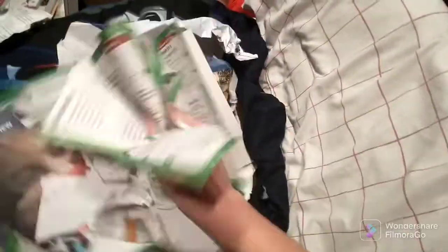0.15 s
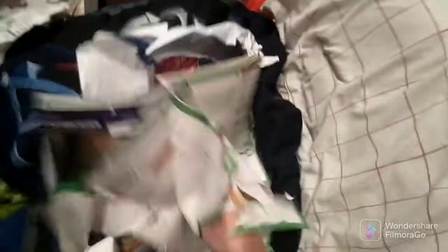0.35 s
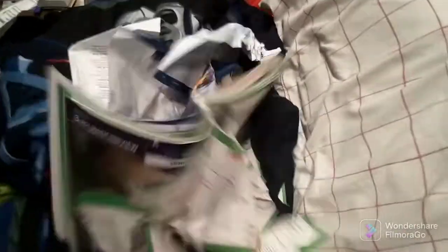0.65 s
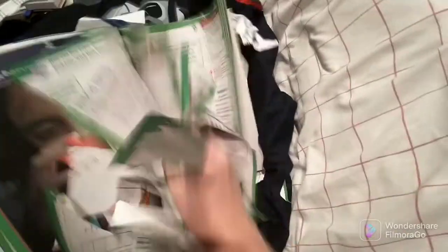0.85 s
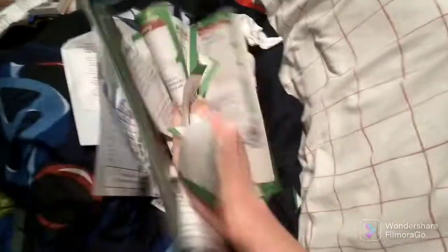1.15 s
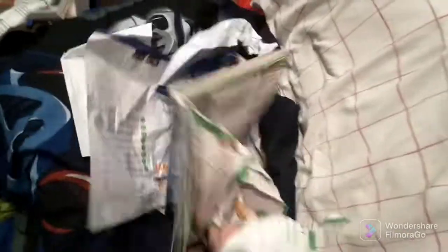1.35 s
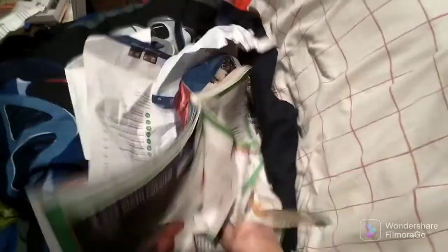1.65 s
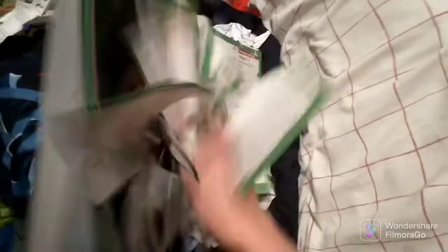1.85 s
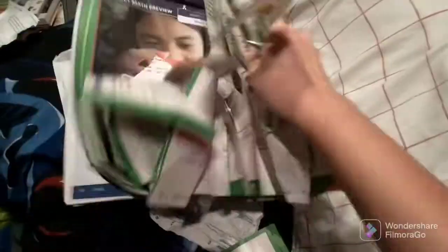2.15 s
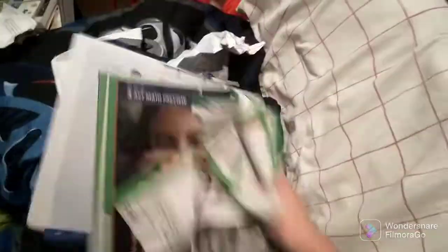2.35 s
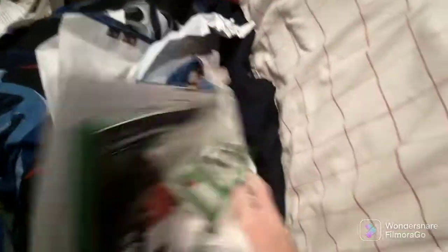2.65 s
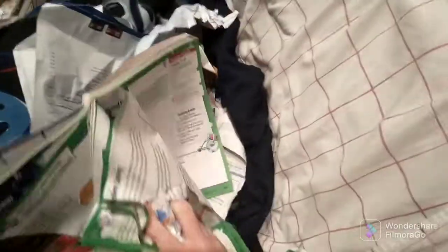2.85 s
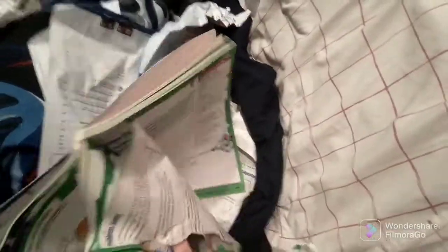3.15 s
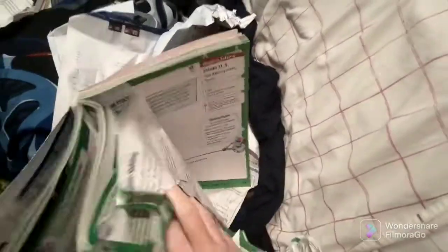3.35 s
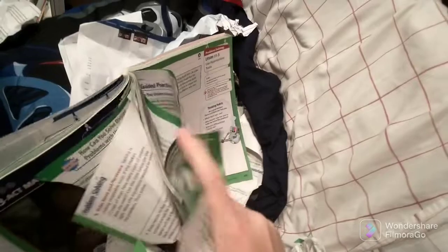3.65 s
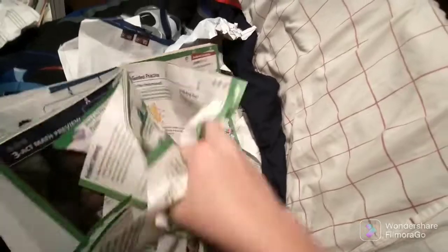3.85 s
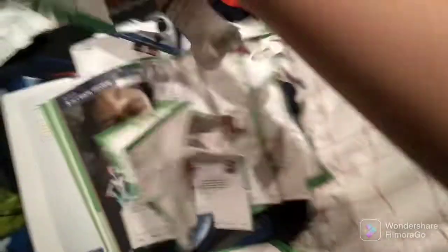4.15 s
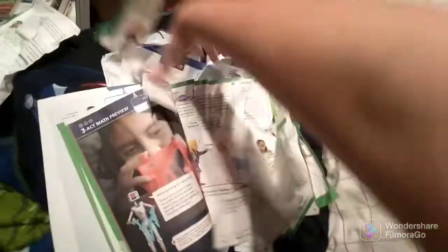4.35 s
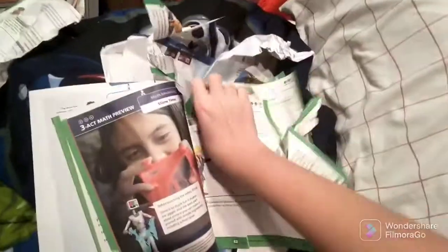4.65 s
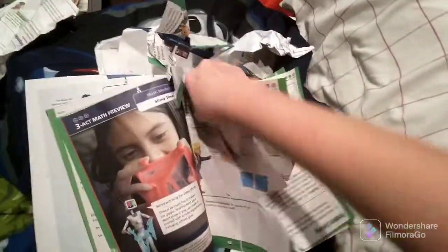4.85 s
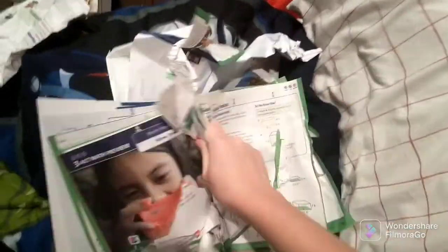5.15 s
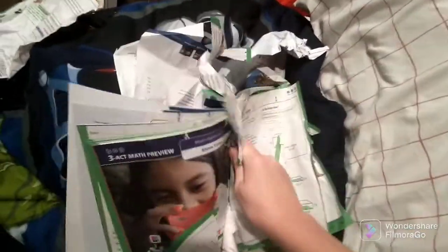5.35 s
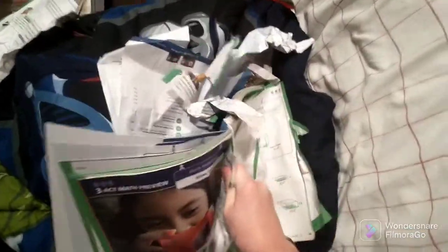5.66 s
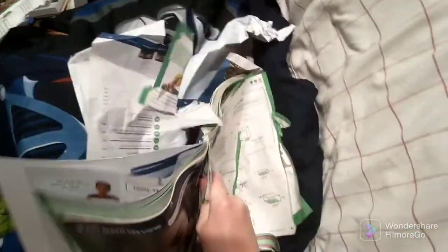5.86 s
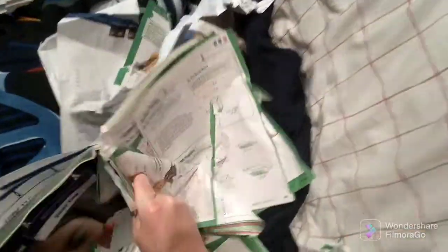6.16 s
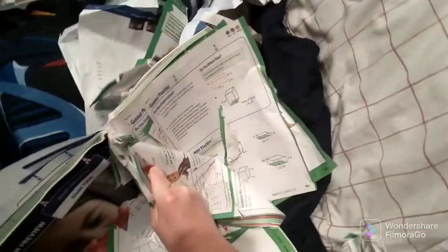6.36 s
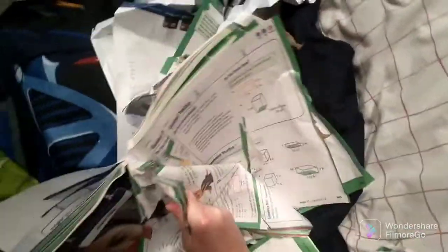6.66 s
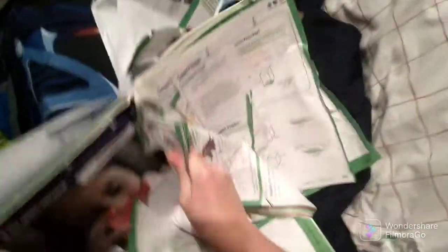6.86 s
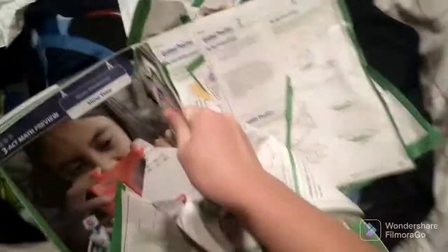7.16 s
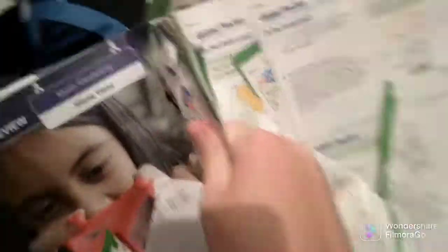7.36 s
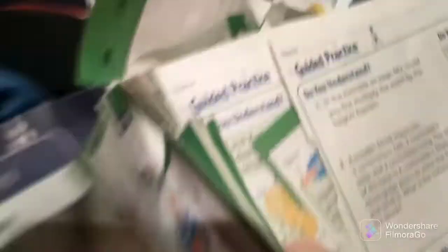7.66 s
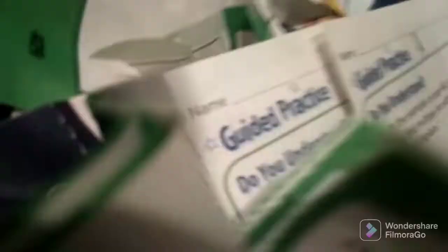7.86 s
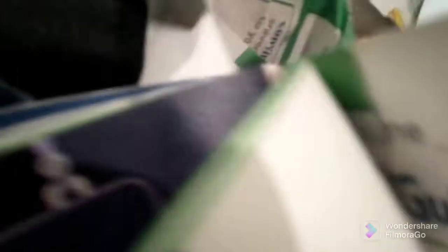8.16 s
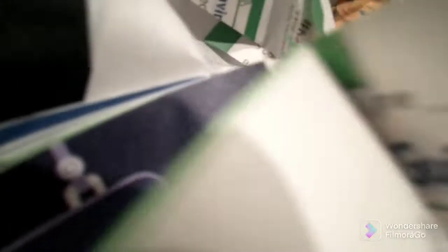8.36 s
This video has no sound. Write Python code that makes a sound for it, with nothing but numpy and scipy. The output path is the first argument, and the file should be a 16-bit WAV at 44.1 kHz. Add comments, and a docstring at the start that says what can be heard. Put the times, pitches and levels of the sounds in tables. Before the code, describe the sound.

In a small soft bedroom, a hand yanks a workbook's pages in hard, regular tugs, with flapping, crackling and sharp rips. A much quieter slow tear follows, then gentle gripping, sliding and leafing with scattered crease snaps and faint spine ticks. After a near-silent moment, a page is crushed right against the stereo microphone with loud pops, low thumps and a short buzzing rub.

```python
"""In a small soft bedroom a workbook on a bed is first jerked by hard tugs, its pages flapping and ripping.
A slow pull follows, then gripping and leafing with a ticking spine; last, a page is crushed beside the microphone.
Hand work is shaped noise: air pushes below, sheet buckling in the middle, tiny fibre cracks on top.
Creases are chirped clicks, rips are fading bursts of cracks, and bumps are short decaying sines.
Sparse reflections and a faint hush surround them; two microphone ports hear it all in stereo."""
import sys
import numpy as np
from scipy import signal
from scipy.fft import rfft, irfft
from scipy.io import wavfile
from scipy.ndimage import uniform_filter1d

SR = 44100
rng = np.random.default_rng(int(sys.argv[2]) if len(sys.argv) > 2 else 0)


def wrap_up_sound(samples):
    """Save the sound to the file named by the first command line argument, as 16-bit audio."""
    columns = np.atleast_2d(samples).T
    # keep every value between -1 and 1, then stretch to whole-number steps
    tamed = np.clip(columns, -1, 1)
    steps = np.round(tamed * 32767).astype(np.int16)
    wavfile.write(sys.argv[1], SR, steps)


N = 375286  # length in samples

# spectrum of the background hush: [f/Hz, gain/dB]
HUSH_COLOUR = [(50, -7), (15000, -20)]
# decay time of the bedroom's reflections: [f/Hz, T60/s]
ROOM_T60 = [(8000, 0.1), (15000, 0.022)]
# the microphone dulls its top: [f/Hz, gain/dB]
TOP_SHELF = [(10200, 0.5), (11600, -7.5)]
# left port against right port: [f/Hz, level difference/dB]
PORT_BALANCE = [(380, -3), (1290, 0), (4400, 1), (8120, -3.5), (15000, -7)]
# when ripping, pulling, gripping, leafing and crushing begin, and the end: [t/s]
STAGE_TIMES = [0, 2.6, 4.05, 6.0, 7.7, 8.515]
# colour of the paper in each stage: [f/Hz, gain/dB]
RIPPING_COLOUR = [(40, -4.5), (110, 2.5), (290, -5.5), (470, 4), (600, -2.5), (760, 2), (1080, -6),
                  (1400, 4), (1680, -4), (2050, -1), (3000, -13), (15500, -15)]
PULLING_COLOUR = [(50, -10), (123, -1.5), (247, -4.5), (472, 3), (1000, -2.5), (2450, -3.5), (3140, -14),
                  (9000, -13), (15500, -13)]
GRIPPING_COLOUR = [(130, 0), (560, 1), (2000, -1), (3100, -7.5), (8000, -12), (15500, -17.5)]
LEAFING_COLOUR = [(100, -3.5), (900, -5), (1600, -10), (4600, -7), (7500, -6.5), (15500, -14)]
CRUSHING_COLOUR = [(40, -2), (120, 1.5), (1200, 0.5), (1650, -3.5), (7000, -18), (15500, -20)]
# colours of a crease's hollow pop and of its bright crack: [f/Hz, gain/dB]
POP_COLOUR = [(150, -12), (450, -2.5), (2400, -3.5), (4000, -38.5)]
CRACK_COLOUR = [(1500, -21.5), (3300, -2.5), (6500, 1.5), (16000, -13.5)]
# the book knocks against the bedding and the fingers: [t/s, envelope peak level/dB, f/Hz]
BUMPS = [(4.888, -34, 380), (5.014, -42, 170), (7.644, -42, 440), (7.671, -42, 900), (7.741, -38, 630),
         (7.788, -33, 950), (7.799, -28.5, 105), (7.859, -31, 164), (7.954, -22, 146), (7.987, -19, 215),
         (8.303, -18.5, 200)]
# the spine ticks as it is bent back: [t/s]
CREAK_TIMES = [6.644, 6.678, 6.746, 6.79, 7.4]
# the held paper stirs between strokes and swells as it nears the microphone at the end:
# [t/s, buckling level/dB, fibre rubbing level/dB]
RUSTLE = [(0, -36.5, -38.5), (2.17, -37.5, -36.5), (2.27, -36.5, -47.5), (2.36, -34.5, -25),
          (2.6, -41.5, -45), (2.67, -47.5, -50), (3.02, -55, -65), (3.4, -65, -50.5), (4.05, -58.5, -59.5),
          (4.5, -68, -67.5), (4.75, -56, -59), (5.85, -65.5, -63.5), (6.45, -56, -61), (6.78, -70, -68.5),
          (7.049, -60, -57.5), (7.569, -70.5, -71), (8.13, -31, -34), (8.51, -38.5, -34)]
# the hand pauses and the rustle sinks: [t/s, half-width/s, level change/dB]
LULLS = [(0.79, 0.035, -4), (1.774, 0.023, -7), (7.55, 0.033, -4.5), (7.712, 0.012, -9)]
# the book is jerked by its pages: [t/s, length/s, buckling level/dB, tearing level/dB]
TUGS = [(0.008, 0.03, -27.5, -28), (0.346, 0.016, -25.5, -27), (0.672, 0.029, -27, -30),
        (0.987, 0.085, -28.5, -32), (1.342, 0.046, -28, -33), (1.689, 0.039, -29.5, -35),
        (1.991, 0.053, -30.5, -30.5), (2.455, 0.016, -30, -32)]
# between tugs the book swings back and its pages flap: [t/s, length/s, buckling level/dB, rubbing level/dB]
FLAPS = [(0.219, 0.051, -34, -37), (0.56, 0.0059, -31, -32.5), (0.873, 0.068, -35, -36),
         (1.204, 0.051, -34.5, -35), (1.548, 0.021, -36, -40.5), (1.657, 0.022, -31.5, -36.5),
         (1.864, 0.048, -31.5, -35), (2.52, 0.011, -31.5, -34)]
# the slow tear advances in separate pulls: [t/s, length/s, buckling level/dB, tearing level/dB]
PULLS = [(2.77, 0.079, -42.5, -43), (2.913, 0.024, -44, -43), (3.082, 0.025, -49.5, -49.5),
         (3.167, 0.063, -52, -51), (3.272, 0.19, -50.5, -48.5), (3.532, 0.02, -53.5, -44),
         (3.608, 0.075, -50.5, -47), (3.807, 0.065, -56, -47), (3.892, 0.057, -55, -50)]
# the hand grips, slides over and turns pages: [t/s, length/s, buckling level/dB, rubbing level/dB]
SWIPES = [(4.107, 0.038, -51.5, -66), (4.169, 0.041, -66, -55.5), (4.338, 0.071, -54, -61.5),
          (4.574, 0.017, -58.5, -56), (4.67, 0.071, -59, -58), (4.774, 0.054, -54, -55),
          (5.077, 0.15, -49, -47), (5.303, 0.038, -55.5, -58.5), (5.388, 0.055, -52.5, -56.5),
          (5.904, 0.014, -47, -49.5), (6.063, 0.26, -50.5, -52), (6.225, 0.15, -49.5, -52),
          (6.418, 0.16, -57.5, -51.5), (7.031, 0.073, -49, -51.5)]
# the fist closes on the page by the microphone: [t/s, length/s, buckling level/dB, cracking level/dB]
SQUEEZES = [(7.897, 0.011, -40.5, -53), (8.227, 0.028, -25.5, -24), (8.297, 0.039, -29.5, -27),
            (8.422, 0.075, -31, -28)]
# creases that snap through: [t/s, pop level/dB, crack level/dB, ringing f/Hz]
SNAPS = [(0.0934, -29, -17, 8700), (0.288, -15.5, -15.5, 1400), (0.5618, -23, -21, 5900),
         (0.64, -19, -36, 780), (0.9871, -13, -16, 750), (1.2305, -24, -16, 5700), (1.406, -15, -30, 620),
         (1.4372, -14, -27, 800), (1.8252, -17.5, -31, 1400), (3.2026, -44, -28, 9400),
         (3.4848, -26, -32, 1160), (3.799, -36, -31, 5200), (3.9665, -34, -38, 1410),
         (4.8047, -32, -35, 2100), (4.8895, -29, -41, 420), (5.0932, -29, -26, 7000),
         (5.308, -37, -30, 2000), (5.5642, -31, -38, 1900), (5.6236, -25, -10.5, 7200),
         (6.0632, -27, -41, 1900), (6.2977, -29, -24, 8200), (6.3432, -33, -19, 7200),
         (6.4072, -39, -25, 6000), (6.7007, -46, -32, 4600), (7.0816, -38, -29, 8400),
         (7.9875, -9, -25, 650), (8.0065, -20, -17, 1430), (8.0395, -6.5, -8.5, 1650),
         (8.0629, -16, -9.5, 4800), (8.0772, -18, -11, 4200), (8.0878, -13, -11, 1140),
         (8.1114, -14.5, -15, 1730), (8.1271, -14, -8.5, 1620), (8.205, -24, -14, 4800),
         (8.2146, -12, -17, 900), (8.3025, -11, -16, 550), (8.321, -13, -20, 450), (8.4815, -13, -13, 4400)]
# the paper gives way in short, sudden runs: [t/s, starting level/dB, fading time/s]
RIPS = [(0.986, -17.5, 0.006), (1.217, -22, 0.009), (1.689, -18.5, 0.009), (1.861, -21, 0.011),
        (2.199, -20, 0.014), (4.914, -35, 0.009), (6.269, -30.5, 0.02), (6.423, -32, 0.008),
        (8.396, -23.5, 0.02)]


def gain_of(db):
    """Decibels to amplitude."""
    return 10 ** (np.asarray(db) / 20)


def evened(x):
    """Scales a stereo sound so that its middle has rms 1."""
    return x / np.sqrt(np.mean(x.mean(0) ** 2) + 1e-20)


def read(points, hz):
    """Reads a spectrum table on a log-frequency axis."""
    f, value = np.transpose(points)
    return np.interp(np.log(hz + 1), np.log(f + 1), value)


def add(mix, s, sound):
    """Mixes a stereo sound in at s seconds."""
    part = mix[:, max(round(s * SR), 0):][:, :sound.shape[1]]
    part += sound[:, :part.shape[1]]


def tint(x, db_at, size=2048):
    """Causal minimum-phase filter whose gain in dB is db_at(Hz), so that attacks stay sharp."""
    hz = abs(np.fft.fftfreq(size, 1 / SR))
    log_gain = np.log(np.maximum(gain_of(db_at(hz)), 1e-5))
    spectrum = np.exp(np.conj(signal.hilbert(log_gain)))
    taps = np.fft.ifft(spectrum).real[..., :size // 2]
    return signal.oaconvolve(x, np.atleast_2d(taps), axes=1)[:, :x.shape[1]]


def band_db(hz, low_hz, high_hz, order=8):
    """Gain in dB of a band with steep skirts."""
    low_skirt = 1 + (low_hz / (hz + 1)) ** order
    high_skirt = 1 + (hz / high_hz) ** order
    return -10 * np.log10(low_skirt * high_skirt)


def room_hush(level_db=-72):
    """The quiet of the place: steady noise, independent at each port, in the colour of the hush."""
    noise = rng.standard_normal((2, N))
    return gain_of(level_db) * evened(tint(noise, lambda hz: read(HUSH_COLOUR, hz)))


def bedroom(x, low_hz=300, size=14000):
    """Sparse reflections from near walls, thin in the bass and quickly soaked up by the bed."""
    signs = rng.choice([-1., 1.], (2, size))
    present = rng.random((2, size)) < .08
    taps = signs * present * (np.arange(size) > .003 * SR)  # nothing returns in the first 3 ms
    hz, t, z = signal.stft(taps, SR, nperseg=256)
    z = z * (hz / (hz + low_hz))[:, None]
    decay = gain_of(-60 * t / read(ROOM_T60, hz)[:, None])
    tail = signal.istft(z * decay, SR, nperseg=256)[1]
    return signal.oaconvolve(x, tail / np.linalg.norm(tail[0]), axes=1)[:, :N]


def bump(s, peak_db, hz, swell_cycles=0.28, size=4096):
    """A soft blow of a few cycles, smothered by the bedding or the hand: a sine that swells and dies."""
    turns = hz * np.arange(size) / SR
    envelope = turns / swell_cycles * np.exp(1 - turns / swell_cycles)
    wave = envelope * np.sin(2 * np.pi * turns)
    return s, gain_of(peak_db) * np.array([wave, wave])


def spine_creak(s):
    """The bent spine ticks: a faint, high blow that swells for one cycle."""
    return bump(s, peak_db=-49, hz=2230, swell_cycles=1.0)


def effort(stage, strokes, rise_s, fall_s):
    """Strokes build up, hold and die away over rustle with lulls: rows of (t/s, buckling/dB, tearing/dB)."""
    t = np.arange(STAGE_TIMES[stage], STAGE_TIMES[stage + 1] + .005, .001)
    s, *levels = np.transpose(RUSTLE)
    # the page goes slack before each tug: level changes for buckling and tearing
    slack_db, slack_lead_s, slack_width_s = [-6, -15], 0.077, 0.049
    slack = sum(np.exp(-((t - tug[0] + slack_lead_s) / slack_width_s) ** 2) for tug in TUGS)
    rustle_db = [np.interp(t, s, db) + dip * slack for db, dip in zip(levels, slack_db)]
    power = gain_of(rustle_db) ** 2
    for start, length, *db in strokes:
        rise = np.minimum(t - start, 0) / rise_s
        fall = np.maximum(t - start - length, 0) / fall_s
        power = power + np.outer(gain_of(db), np.exp(rise - fall)) ** 2
    # pulled taut just before it rips, the sheet goes quiet
    before_s, taut_s, taut_db = .005, .008, -5.5
    taut = [(row[0] - before_s, taut_s, taut_db) for row in RIPS]
    lull_db = sum(db * np.exp(-((t - at) / width) ** 2) for at, width, db in list(LULLS) + taut)
    return np.column_stack([t, (10 * np.log10(power) + lull_db).T])


def snap(s, pop_db, crack_db, hz, lag_s=0.0013, flip_s=0.00078, scatter=0.45,
         ring_db=8, ring_octaves=0.88, trim_db=-0.55, size=1024):
    """A crease clicks and shivers; bending waves carry its treble out first, and the facet rings at hz."""
    bins, t = np.fft.rfftfreq(size, 1 / SR), np.arange(size) / SR
    delay = lag_s * np.sqrt(8000 / (bins + 800))
    phase = 2 * np.pi * np.cumsum(delay - delay.min()) * SR / size
    chirp = irfft(np.exp(-1j * phase))
    shiver = rng.standard_normal((2, size)) * t / flip_s * np.exp(-t / flip_s)
    flip = signal.unit_impulse(size) + scatter * shiver
    wave = signal.fftconvolve(flip, chirp[None], axes=1)

    def ringing(f):
        return ring_db * np.exp(-(np.log2((f + 1) / hz) / ring_octaves) ** 2)

    out = 0
    for colour, db in [(POP_COLOUR, pop_db), (CRACK_COLOUR, crack_db)]:
        x = tint(wave, lambda f: read(colour, f) + ringing(f))
        out = out + gain_of(db + trim_db) * x / abs(x.mean(0)).max()
    return s, out


def crinkles(work, count, over_db, limit_db, low_hz, high_hz):
    """Small creases of all sizes flip at random moments, louder as the hand works harder, up to a limit."""
    out = np.zeros((2, N))
    for when, stiffness, pop_size, crack_size in rng.random((count, 4)):
        s, buckling, tearing = work[int(when * len(work))]
        drive_db = np.minimum([buckling, tearing], limit_db)
        pop_db, crack_db = drive_db + over_db - 10 * np.array([pop_size, crack_size])
        add(out, *snap(s, pop_db, crack_db, low_hz * (high_hz / low_hz) ** stiffness))
    return out


def judder(start_s, length_s, hz, level_db, jitter=0.2, rasp_gain=0.5 * gain_of(-1), left_db=-7):
    """The page sticks and slips along an edge by the right port: a low buzz with a rasp at each slip."""
    t = np.arange(0, length_s, 1 / SR)
    wobble = uniform_filter1d(rng.standard_normal(N), size=200)
    turns = np.cumsum(hz * (1 + jitter * wobble[:len(t)] / wobble.std())) / SR
    slips = np.exp(-2 * (turns % 1)) * rng.standard_normal((2, len(t)))
    rasp = tint(slips, lambda f: read(POP_COLOUR, f) + read(CRUSHING_COLOUR, f))
    buzz = gain_of([[left_db], [0]]) * np.sin(2 * np.pi * turns)
    wave = buzz + rasp_gain * evened(rasp)
    return start_s, gain_of(level_db) * wave * signal.windows.tukey(len(t), .25)


def crackle(n, per_s, spread_db, clump_db, clump_s, ring_s, rub, port_s, count=14, size=256):
    """Tiny cracks of very unequal size, in clumps, from many facets of the sheet, over smooth rubbing."""
    t = np.arange(size) / SR
    knots = np.arange(0, n + SR * clump_s, SR * clump_s)
    clumps = gain_of(clump_db * np.interp(np.arange(n), knots, rng.standard_normal(n)[:len(knots)]))
    sizes = gain_of(spread_db * np.minimum(rng.exponential(1, n), 5))
    cracks = sizes * (rng.random(n) < per_s / SR) * rng.choice([-1, 1], n)
    facet, out = rng.integers(0, count, n), np.zeros((2, n))
    hz = np.fft.rfftfreq(2 * size, 1 / SR)
    for k, bearing in enumerate(np.linspace(-1, 1, count)):
        # each facet rings in its own way; its bearing sets the time difference between the ports
        ring = rfft(rng.standard_normal(size) * np.exp(-t / ring_s), 2 * size)
        delay = port_s * (1 + bearing * np.array([[-.5], [.5]]))
        heard = irfft(ring * np.exp(-2j * np.pi * hz * delay))
        out += signal.oaconvolve((cracks * (facet == k))[None], heard, axes=1)[:, :n]
    out = (out / out.std() + rub * rng.standard_normal((2, n))) * clumps
    # the hand feeds in energy steadily: a big crack leaves less for its neighbours
    return out / np.sqrt(uniform_filter1d((out ** 2).mean(0), size=1400) + 1e-9)


def rip(s, level_db, fade_s, bright_db=1.5, size=4096):
    """A whole row of fibres fails at once, then the tear runs out, in the colour of that stage's paper."""
    fibres = crackle(size, per_s=5000, spread_db=5.0, clump_db=-5.0, clump_s=0.00076,
                     ring_s=0.00037, rub=0.1, port_s=0.00027, count=6)
    colours = [RIPPING_COLOUR, PULLING_COLOUR, GRIPPING_COLOUR, LEAFING_COLOUR, CRUSHING_COLOUR]
    colour = colours[np.searchsorted(STAGE_TIMES, s) - 1]
    voiced = tint(fibres, lambda hz: read(colour, hz) + bright_db * np.log2(hz + 1))  # dB an octave
    return s, gain_of(level_db) * evened(voiced) * np.exp(-np.arange(size) / SR / fade_s)


def air_push(n, apart, lump_db=4.5):
    """Sheets shove the air; the larger apart is, the lumpier the draught and the more it buffets the right port."""
    lumps = uniform_filter1d(rng.standard_normal(n), size=700)
    buffets = np.array([[.5], [2]]) * rng.standard_normal((2, n))
    draught = rng.standard_normal(n) + apart * buffets
    return draught * gain_of(apart * lump_db * lumps / lumps.std())


def flex(x, patch_db=3.5, size=512):
    """As the sheet bends, its resonances wander: passing peaks and dips in the colour."""
    overlap = 3 * size // 4
    z = signal.stft(x, nperseg=size, noverlap=overlap)[2]
    patches = uniform_filter1d(rng.standard_normal(z.shape[1:]), size=3, axis=0)  # across frequency
    patches = uniform_filter1d(patches, size=12, axis=1)  # along time
    # crowded high modes average out
    depth = patch_db / (1 + np.fft.rfftfreq(size, 1 / SR)[:, None] / 5000)
    flexed = z * gain_of(depth * patches / patches.std())
    return signal.istft(flexed, nperseg=size, noverlap=overlap)[1][:, :x.shape[1]]


def brighten(x, work, from_db, growth, edge_hz=10500):
    """The harder a page is rubbed, the more its top sizzles: growth dB for each dB of rubbing over from_db."""
    top = signal.sosfiltfilt(signal.butter(2, edge_hz, "high", fs=SR, output="sos"), x)
    rubbing_db = growth * np.maximum(work[:, 2] - from_db, 0)
    extra_db = np.interp(np.arange(N) / SR, work[:, 0], rubbing_db, left=0, right=0)
    return x + top * (gain_of(extra_db) - 1)


def handling(rows, colour, air_db, fibre_spread_db, buckle_spread_db=1.5, air_growth=0.78, apart=0.066,
             buckles_per_s=1300, fibres_per_s=1700, clump_db=3.2):
    """One stage of hand work: low air pushes, buckling of the sheet, and bright cracks of its fibres."""
    s, buckling, tearing = np.transpose(rows)
    t = np.arange(s[0], s[-1], 1 / SR)
    # air level follows the buckling, its swings scaled by air_growth: a faster sheet moves more air
    pushing = buckling.mean() + air_growth * (buckling - buckling.mean())
    air = air_push(len(t), apart)
    buckles = flex(crackle(len(t), buckles_per_s, buckle_spread_db, clump_db, clump_s=.009,
                           ring_s=0.00091, rub=.22, port_s=0.00028))
    fibres = crackle(len(t), fibres_per_s, fibre_spread_db, clump_db, clump_s=0.01,
                     ring_s=0.002, rub=.5, port_s=0.0004235)
    edges_hz = [25, 250, 2800, 18000]
    out = 0
    for k, (drive, level_db) in enumerate([(air, pushing + air_db), (buckles, buckling), (fibres, tearing)]):
        voiced = tint(drive, lambda hz: read(colour, hz) + band_db(hz, edges_hz[k], edges_hz[k + 1]))
        out = out + evened(voiced) * gain_of(np.interp(t, s, level_db))
    return s[0], out * signal.windows.tukey(len(t), 400 / len(t))  # fades of 200 samples


def scene():
    """Tugs, pulling, gripping, leafing and crushing, with their snaps, rips and bumps, in the quiet room."""
    RIP, PULL, GRIP, LEAF, CRUSH = range(5)
    ripping = effort(RIP, TUGS + FLAPS, rise_s=0.017, fall_s=0.023)
    pulling = effort(PULL, PULLS, rise_s=0.013, fall_s=0.038)
    gripping = effort(GRIP, SWIPES, rise_s=0.017, fall_s=0.02)
    leafing = effort(LEAF, SWIPES, rise_s=0.017, fall_s=0.02)
    crushing = effort(CRUSH, SQUEEZES, rise_s=0.0073, fall_s=0.0072)

    paper = np.zeros((2, N))
    add(paper, *handling(ripping, RIPPING_COLOUR, air_db=-14, air_growth=1.38, fibre_spread_db=-0.5))
    add(paper, *handling(pulling, PULLING_COLOUR, air_db=-12.0, fibre_spread_db=0.5))
    add(paper, *handling(gripping, GRIPPING_COLOUR, air_db=-10, fibre_spread_db=3.0))
    add(paper, *handling(leafing, LEAFING_COLOUR, air_db=-11.0, fibre_spread_db=3.5))
    add(paper, *handling(crushing, CRUSHING_COLOUR, air_db=-2.5, apart=0.87, buckle_spread_db=3.5,
                         fibre_spread_db=3.5, buckles_per_s=800))
    paper = brighten(paper, np.vstack([gripping, leafing]), from_db=-57.0, growth=1.0)

    work = np.vstack([ripping, pulling, gripping, leafing, crushing])
    paper += crinkles(work, count=240, over_db=14.5, limit_db=-38, low_hz=800, high_hz=8000)
    for source, table in [(snap, SNAPS), (rip, RIPS), (bump, BUMPS)]:
        for row in table:
            add(paper, *source(*row))
    for s in CREAK_TIMES:
        add(paper, *spine_creak(s))
    add(paper, *judder(start_s=8.427, length_s=0.052, hz=221.5, level_db=-17.0))

    room_db = -12
    return paper + gain_of(room_db) * bedroom(paper) + room_hush()


def record(dry, low_cut_hz=40, edge_hz=16100):
    """The microphone sheds deep bass, dulls the top, colours its two ports differently and ends at edge_hz."""
    lean = signal.sosfilt(signal.butter(2, low_cut_hz, "high", fs=SR, output="sos"), dry)
    halves = np.array([[.5], [-.5]])  # the balance is shared between left and right
    ported = tint(lean, lambda hz: read(TOP_SHELF, hz) + read(PORT_BALANCE, hz) * halves)
    band_limit = signal.firwin(511, edge_hz, window=("kaiser", 9), fs=SR)
    return signal.oaconvolve(ported, band_limit[None], "same", axes=1)


dry = scene()
out = record(dry)
wrap_up_sound(out)
```